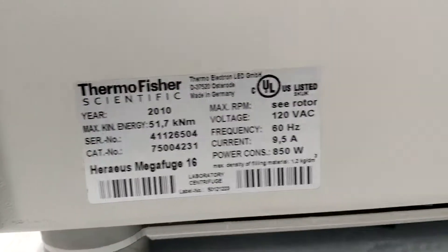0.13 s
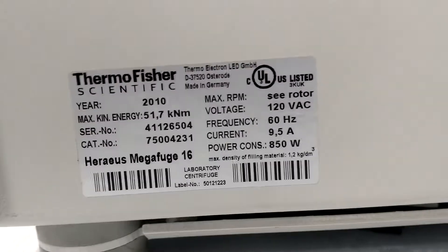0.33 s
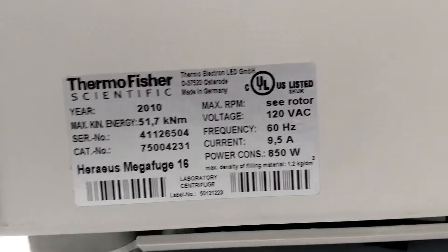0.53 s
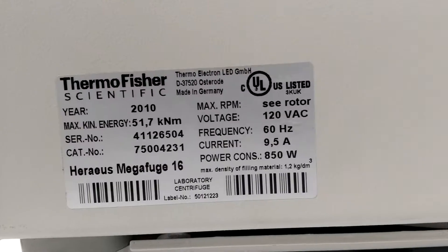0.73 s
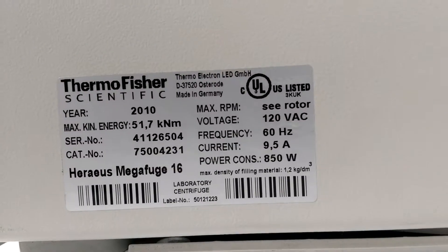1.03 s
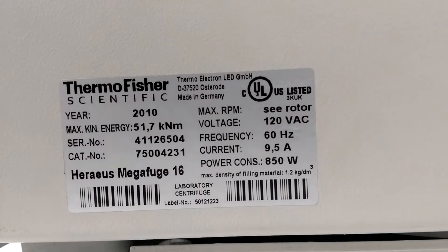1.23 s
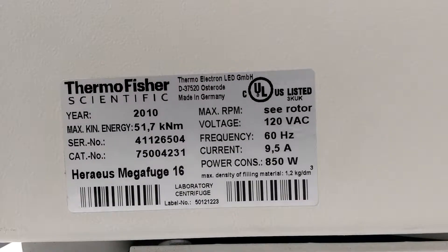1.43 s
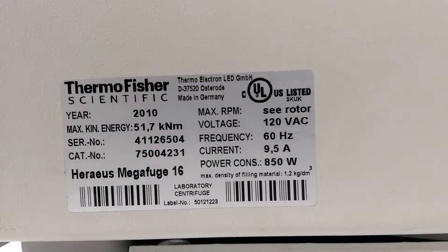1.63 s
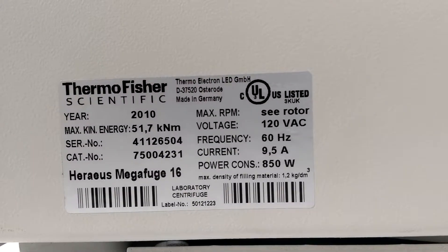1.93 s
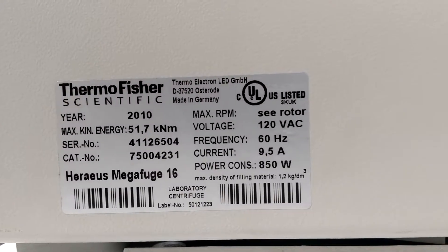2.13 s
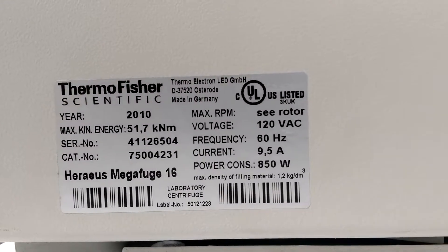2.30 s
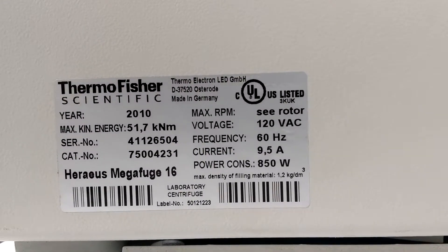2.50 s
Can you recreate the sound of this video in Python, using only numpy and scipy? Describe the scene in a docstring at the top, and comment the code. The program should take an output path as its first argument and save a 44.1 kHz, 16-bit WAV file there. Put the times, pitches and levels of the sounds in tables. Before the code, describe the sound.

Laboratory centrifuge spinning up indoors, low hum slowly rising over rushing air, brief handling ticks

```python
"""A laboratory centrifuge spins up indoors, heard close to its steel casing.
From the start its four buckets hum on two rising tones, over filtered noise for the air they stir.
Near 0.4 s a hand makes a scuff and ticks from bursts of noise, with single ticks near 0.8 and 1.2 s.
From about 0.6 s thin motor whines, rising sines, climb one after another through a panel resonance.
After 1.5 s a faint band of hiss emerges, pulsing once a turn, and sinks back near the end."""
import sys
import numpy as np
from scipy import signal
from scipy.fft import rfft, irfft
from scipy.io import wavfile
from scipy.ndimage import uniform_filter1d

SR = 44100
rng = np.random.default_rng(int(sys.argv[2]) if len(sys.argv) > 2 else 0)


def output_pcm(signal):
    """Save a mono or channel-first signal as 16-bit PCM at the path in sys.argv[1].

    Samples are clipped to [-1, 1] before scaling.
    """
    pcm = np.clip(np.atleast_2d(signal).T, -1, 1) * 32767
    wavfile.write(sys.argv[1], SR, np.round(pcm).astype(np.int16))


N = 117306
T = np.arange(N) / SR

# Hum swelling and fading at each microphone as its notes climb through standing waves:
# (t/s, bucket note left level/dB, bucket note right level/dB, octave left level/dB, octave right level/dB)
HUM_LEVELS = [(0, -29, -19, -31.5, -19), (0.15, -29.5, -28, -30.5, -19.5), (0.3, -31, -21, -28, -21),
              (0.48, -29, -28, -23.5, -21), (0.65, -22.5, -45, -22, -18), (0.8, -23.5, -54, -23.5, -20),
              (0.95, -31, -36, -21.5, -18), (1.15, -32, -32, -20.5, -18.5), (1.3, -33.5, -29, -17, -16),
              (1.5, -30, -29.5, -16, -18.5), (1.7, -25, -35, -15.5, -20), (1.9, -22, -53, -16.5, -22),
              (2.05, -17.5, -24, -17.5, -23.5), (2.25, -16, -25.5, -18, -23), (2.45, -17.5, -29, -20, -24),
              (2.65, -17, -36, -20, -22.5)]
# Phase by which the bucket note leads on the left: (t/s, lead/rad)
BUCKET_LEAD = [(0, 2.05), (.35, -1.3), (.95, -3.5), (1.3, -1.2), (1.7, 1), (2.05, -1.5), (2.65, 1.3)]
# Imbalance tone, once a turn: (t/s, left level/dB, right level/dB)
IMBALANCE_LEVELS = [(0, -65, -48), (1.2, -55, -47), (1.7, -48, -38.5), (2.1, -44, -40), (2.65, -41, -38)]
# Third multiple of the bucket note, alike at both microphones: (t/s, level/dB)
THIRD_LEVELS = [(0, -63), (.65, -37.5), (.95, -33), (1.3, -38), (1.7, -46), (2.65, -61)]
# Motor whines: multiples of the rotor speed [1]
WHINE_MULTIPLES = [89.6, 85.6, 82.2, 81.3, 78.1, 77.2]
# Left level of each whine at the top of the panel resonance: (level/dB)
WHINE_PEAKS = [-50, -48, -49, -51.5, -52.5, -55.5]
# Colour of the air rushing in the bowl, before its trim and surges:
# (f/Hz, left level/dB per Hz, right level/dB per Hz)
AIR_COLOUR = [(20, -85, -84), (38, -85, -76), (55, -78, -64), (87.5, -56.5, -57.5), (125.5, -57.5, -51),
              (177, -52, -47.5), (310, -68, -53), (326, -52.5, -52.5), (570, -57, -53), (680, -56.5, -52),
              (826, -52.5, -52), (991, -52, -51.5), (1242, -62, -62.5), (1460, -57.5, -62.5),
              (1435, -62, -68.5), (1905, -65, -66.5), (2690, -75.5, -73.5), (4100, -79, -79.5),
              (5900, -78.5, -81.5), (6700, -82.5, -79.5), (7420, -84, -89), (8950, -90.5, -87),
              (11400, -97, -89), (15500, -103, -93)]
# Surges of the air, each column taken about its own mean: (t/s, rush level/dB, rumble level/dB)
AIR_SURGES = [(0, -0.5, -1), (.48, -1, -1), (.62, .7, -0.5), (.95, 1, 0), (1.15, 1.6, 1.5), (1.29, 1.5, .5),
              (1.4, -.5, -1), (1.7, 0.4, -3), (2, 0.2, 0), (2.4, 0, -1), (2.66, 0, 0)]
# Drift of the treble in the air: (t/s, level/dB)
AIR_TREBLE = [(0, -2.5), (.5, -2), (.9, -2), (1.25, -1.3), (1.45, -.7), (1.85, .5), (2.25, 1.1),
              (2.66, -0.2)]
# How far each range follows those levels: (f/Hz, rush share [1], rumble share [1], treble share [1])
AIR_SHARES = [(170, 0.57, 1, 0.15), (400, 0.86, 0, 0.52), (1100, 1, 0.09, 0.047), (2500, 0.9, 0.4, 0.23),
              (7000, 1, 0.14, 0.53), (10000, 1, 0, 1)]
# Depth to which left and right agree or oppose in the stereo-widened air noise: (f/Hz, depth [1])
STEREO_LIKENESS = [(50, .1), (110, 0.74), (290, 0.67), (450, 0.81), (1000, 0.99), (1400, 0.99),
                   (2150, .995), (3200, 0.6), (4350, 0.99), (5300, 0.76), (6400, 0.83), (7400, .6),
                   (8500, 0.41), (10000, .05)]
# Handling taps, level at the right before the envelope:
# (t/s, level/dB, decay/s, lowest f/Hz, highest f/Hz, left minus right level/dB)
HAND_TAPS = [(0.3854, -29.5, 0.004, 2930, 8160, 0), (.3845, -38.5, 0.02, 10500, 16000, -9),
             (.3962, -17, 0.0011, 5500, 13500, -15), (0.395, -21, 0.0011, 5050, 7900, -8),
             (0.4, -37, 0.0079, 3060, 3600, 3), (.401, -38, 0.0035, 8500, 11500, -11),
             (0.4128, -31, 0.0021, 4230, 9400, 1.5), (0.788, -36, .002, 9300, 11700, -7),
             (1.226, -40, .005, 7500, 14100, -9)]
# Thin hiss at the top of a pulse, at the right: (t/s, level/dB)
HISS_LEVELS = [(0, -80), (1.45, -65), (1.8, -50.5), (2.25, -49.5), (2.38, -62), (2.66, -67)]

START_HZ, RISE_HZ_PER_S, EASE_HZ_PER_S2 = 51, 4.66, 0.14
HUM_FLUTTER = 0.083  # rms share of the level
TONE_WANDER_HZ, TONE_JITTER_RAD = 22, 0.11
IMBALANCE_LEAD_RAD = 2.14
PANEL_HZ, PANEL_WIDTH_HZ, PANEL_AIR_DB = 4815, 61, 4.5
WHINE_RIGHT_DB, WHINE_FLUTTER = -9, 0.32
AIR_TRIM_DB, PATCH_DB, FLICKER_DB, RANDOM_RIPPLE_DB = -0.5, 0.52, 1.26, 0.5
COMB_HZ, COMB_EDGE = 2160, 1.3  # spacing and steepness of the agreeing and opposing bands
FRAME, HOP = 2048, 512  # samples
TAP_RISE_S = 0.00045
HISS_LOW_HZ, HISS_HIGH_HZ, HISS_SHARPNESS, HISS_LEFT_DB = 10000, 12000, 1.2, -12
BASS_EDGE_HZ, TREBLE_EDGE_HZ = 48, 15870


def rotor(speed):
    """Imbalance shakes once a turn; four passing buckets sound at 4 times the speed, with overtones."""
    hum = curve(HUM_LEVELS, T)
    bucket_lead = curve(BUCKET_LEAD, T)[0]
    imbalance = tone(speed, curve(IMBALANCE_LEVELS, T), IMBALANCE_LEAD_RAD, order=1)
    bucket_note = tone(speed, hum[:2], bucket_lead, order=4)
    octave = tone(speed, hum[2:], order=8)
    third = tone(speed, curve(THIRD_LEVELS, T), order=12)
    return imbalance + bucket_note + octave + third


def tone(speed, level_db, lead=0, flutter=HUM_FLUTTER, order=1):
    """One multiple of the rotor speed at both microphones, shaken a little by turbulence."""
    angle = 2 * np.pi * order * np.cumsum(speed) / SR
    angle = angle + TONE_JITTER_RAD * wander(TONE_WANDER_HZ)
    swell = 1 + flutter * wander(TONE_WANDER_HZ)
    # Root two makes the level an rms level
    return np.sqrt(2) * amp(level_db) * swell * np.cos([angle, angle - lead])


def air():
    """Turbulent air in the bowl: coloured noise, lifted at the panel resonance, surging in patches."""
    hz = np.fft.rfftfreq(FRAME, 1 / SR)
    t = np.arange(N // HOP + 3) * HOP / SR
    a, b, c, d, patches = rng.standard_normal((5, len(t), len(hz)))

    # Patches smear over neighbouring frames and frequencies
    patches = uniform_filter1d(patches, size=5, axis=0)
    patches = evened(uniform_filter1d(patches, size=14, axis=1))
    # Slight random unevenness across frequency, steady in time
    ripple = evened(uniform_filter1d(rng.standard_normal(len(hz)), size=2))
    ripple = ripple * np.minimum(hz / 1500, 1)

    # Stereo widening: left and right agree in the lows, then alternate with opposition up the range
    comb = -np.cos(2 * np.pi * np.maximum(hz, COMB_HZ / 2) / COMB_HZ)
    bands = np.tanh(COMB_EDGE * comb) / np.tanh(COMB_EDGE)
    same = np.clip(spectrum(STEREO_LIKENESS, hz)[0] * bands, -1, 1)
    left = a + 1j * b
    right = same * left + np.sqrt(1 - same ** 2) * (c + 1j * d)

    surges = curve(AIR_SURGES, t)
    surges = surges - surges.mean(1, keepdims=True)
    levels = np.vstack([surges, curve(AIR_TREBLE, t)])
    flicker = FLICKER_DB * rng.standard_normal((len(t), 1))
    motion_db = levels.T @ spectrum(AIR_SHARES, hz) + PATCH_DB * patches + flicker
    fixed_db = RANDOM_RIPPLE_DB * ripple + PANEL_AIR_DB * panel(hz)
    colour_db = AIR_TRIM_DB + spectrum(AIR_COLOUR, hz)[:, None]
    frames = np.array([left, right]) * amp(colour_db + motion_db + fixed_db)

    rush = signal.istft(frames.swapaxes(1, 2), nperseg=FRAME, noverlap=FRAME - HOP)[1][:, :N]
    # Scales the overlapping frames for levels given per Hz
    return rush * np.sqrt(1.5 * SR / FRAME)


def motor(speed):
    """High whines at multiples of the speed, each loudest as it crosses the panel resonance."""
    whine = np.zeros((2, N))
    for order, peak_db in zip(WHINE_MULTIPLES, WHINE_PEAKS):
        whine += panel(order * speed) * tone(speed, peak_db, flutter=WHINE_FLUTTER, order=order)
    return whine * amp([[0], [WHINE_RIGHT_DB]])


def panel(hz):
    """Response of the ringing casing panel, 1 at its peak."""
    return 1 / np.sqrt(1 + (2 * (hz - PANEL_HZ) / PANEL_WIDTH_HZ) ** 2)


def taps():
    """A short scuff and dry ticks of a hand close by: noise bursts that rise fast and die away."""
    out = np.zeros((2, N))
    for start, right_db, decay, low_hz, high_hz, left_db in HAND_TAPS:
        age = np.maximum(T - start, 0)
        envelope = np.minimum(age / TAP_RISE_S, 1) * np.exp(-age / decay)
        out += amp([[right_db + left_db], [right_db]]) * envelope * band_noise(low_hz, high_hz)
    return out


def hiss(speed):
    """A faint high band of noise, swelling once in every turn of the rotor."""
    turn = 2 * np.pi * np.cumsum(speed) / SR
    pulse = (0.5 + 0.5 * np.cos(turn)) ** HISS_SHARPNESS
    level = amp(curve(HISS_LEVELS, T)) * amp([[HISS_LEFT_DB], [0]])
    return band_noise(HISS_LOW_HZ, HISS_HIGH_HZ) * pulse * level


def band_noise(low_hz, high_hz):
    """Unrelated noise at the two microphones, between two soft edges, at rms 1."""
    hz = np.fft.rfftfreq(N, 1 / SR)
    low_edge = 1 - 1 / (1 + (hz / low_hz) ** 8)
    high_edge = 1 / (1 + (hz / high_hz) ** 12)
    return evened(irfft(rfft(rng.standard_normal((2, N))) * low_edge * high_edge, N))


def wander(rate_hz):
    """Slow random drift of rms 1, its noise rolled off above the rate."""
    hz = np.fft.rfftfreq(N, 1 / SR)
    return evened(irfft(rfft(rng.standard_normal(N)) / (1 + (hz / rate_hz) ** 2), N))


def amp(db):
    """Decibels to gain."""
    return 10 ** (np.asarray(db) / 20)


def evened(x):
    """Scales to rms 1."""
    return x / np.sqrt(np.mean(x ** 2) + 1e-20)


def curve(table, t):
    """Every column of a table at the times t."""
    at, *columns = np.transpose(table)
    return np.array([np.interp(t, at, column) for column in columns])


def spectrum(table, hz):
    """Every column of a table on a log-frequency axis."""
    at, *columns = np.transpose(table)
    return np.array([np.interp(np.log(hz + 1), np.log(at), column) for column in columns])


def scene():
    """The rotor gains speed, its rise easing a little, and carries hum, whines and hiss with it."""
    speed = START_HZ + RISE_HZ_PER_S * T - EASE_HZ_PER_S2 * T ** 2  # turns per second
    return rotor(speed) + air() + motor(speed) + taps() + hiss(speed)


def record(dry):
    """The recorder cuts the deepest bass and the top treble."""
    bass_cut = signal.butter(10, BASS_EDGE_HZ, "high", fs=SR, output="sos")
    treble_cut = signal.firwin(511, TREBLE_EDGE_HZ, window=("kaiser", 9), fs=SR)
    return signal.oaconvolve(signal.sosfilt(bass_cut, dry), treble_cut[None], "same")


dry = scene()
out = record(dry)
output_pcm(out)
```